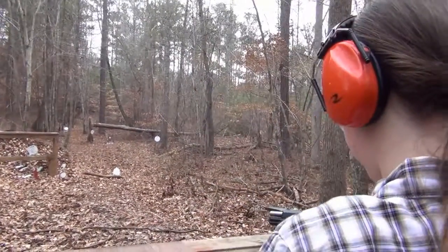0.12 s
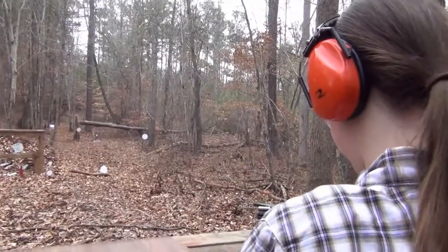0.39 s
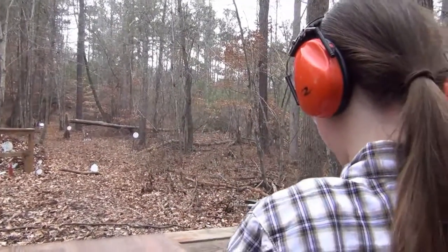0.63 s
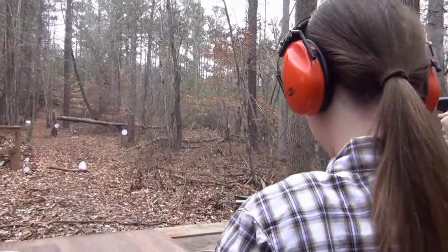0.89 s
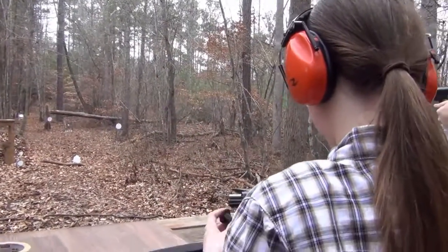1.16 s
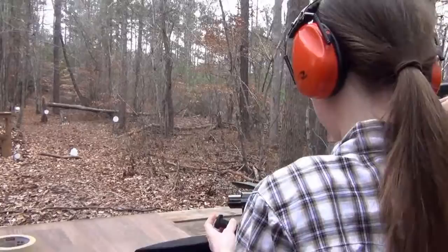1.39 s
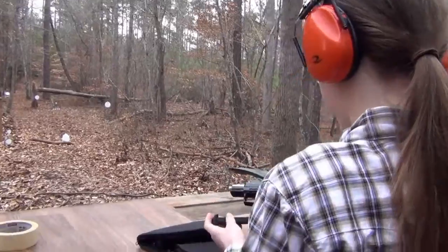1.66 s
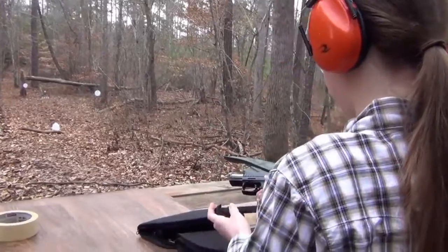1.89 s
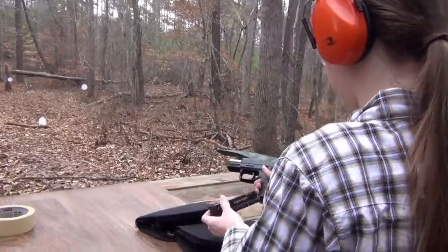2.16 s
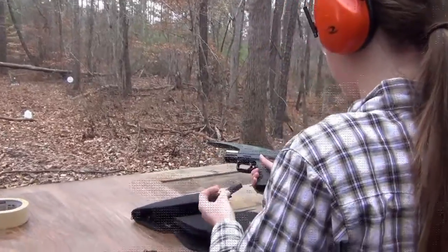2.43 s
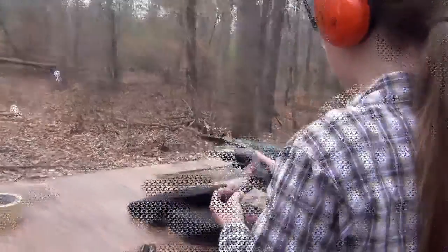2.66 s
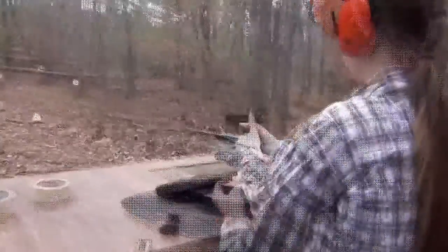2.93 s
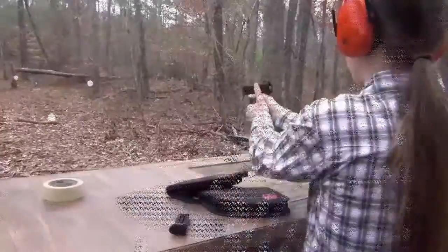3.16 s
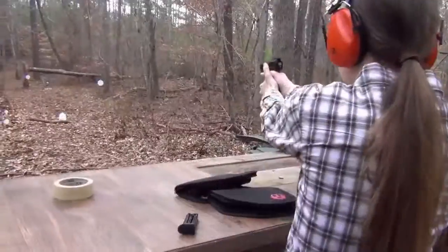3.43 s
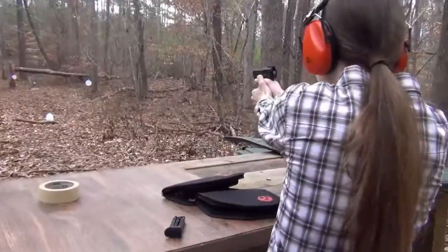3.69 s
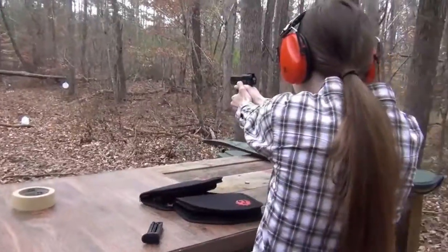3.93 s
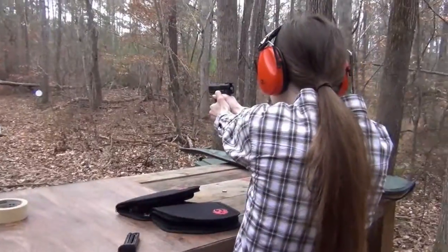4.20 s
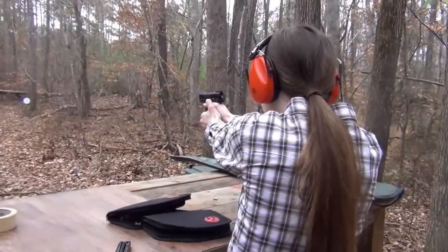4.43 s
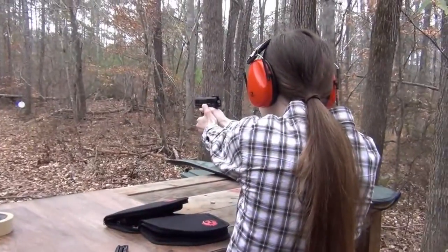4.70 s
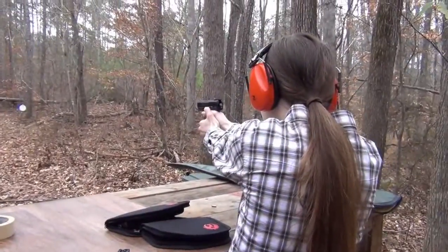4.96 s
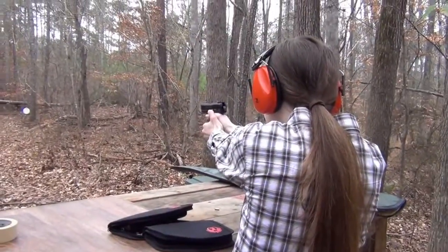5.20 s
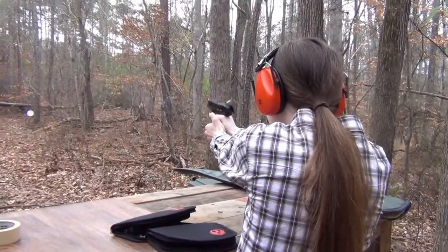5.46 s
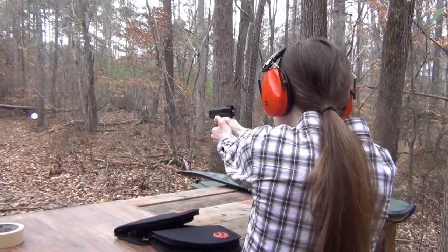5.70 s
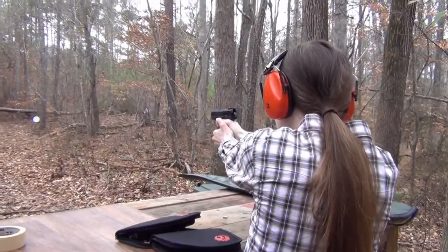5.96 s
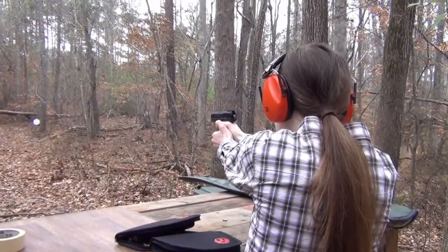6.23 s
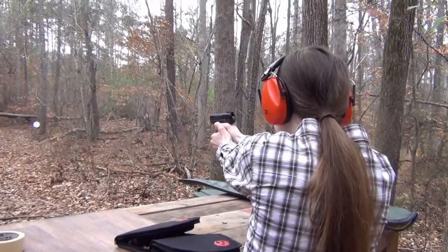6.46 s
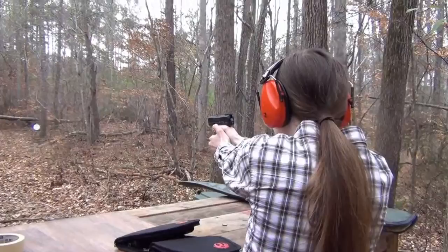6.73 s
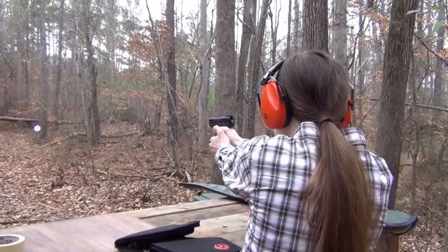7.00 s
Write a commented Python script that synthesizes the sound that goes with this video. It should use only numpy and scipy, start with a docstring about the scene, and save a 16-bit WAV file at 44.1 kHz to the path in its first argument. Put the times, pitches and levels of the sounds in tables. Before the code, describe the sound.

Four gunshots at an outdoor bench, heard from just behind the shooter. The first two are light and snappy, the later two deeper and thumpier. The first three are followed by a bright wavering clang from steel downrange. Echoes slap off trunks and merge into long, dulling hiss. Between shots come faint plate taps, wooden knocks, metallic clicks and cloth rustle over soft, low air noise, with heavy limiting on the blasts.

```python
"""Pistol practice in a bare wood

Small pistols are fired from a bench: each shot is a crack and a thump of noise, then noise slaps off the
trunks that merge into a long hiss. A steel plate downrange rings as paired, beating modes; spent cases,
clicks and cloth are shaped noise close to the microphone. The camera's limiter flattens every shot. One
scene dissolves into a second, nearer one where clothing rustles before a deeper shot."""
import sys
import numpy as np
from scipy import signal
from scipy.fft import rfft, irfft
from scipy.io import wavfile
from scipy.ndimage import uniform_filter1d

SR = 44100
rng = np.random.default_rng(int(sys.argv[2]) if len(sys.argv) > 2 else 0)


def unload_wav(signal):
    """Save mono or channel-first audio to the path in sys.argv[1] as 16-bit WAV at rate SR, clipped to [-1, 1]."""
    wavfile.write(
        sys.argv[1],
        SR,
        np.round(np.clip(np.atleast_2d(signal).T, -1, 1) * 32767).astype(np.int16),
    )


def ratio_of_db(decibels):
    """Turn decibels (scalar or array-like) into linear amplitude factors; 0 dB maps to 1."""
    return 10 ** (np.asarray(decibels, float) / 20)


N = 313551  # length in samples

# bright colour of cloth: hz, density_db (dB per Hz)
CLOTH_COLOUR = [(120, -47), (200, -7.5), (454, -5.5), (827, -8), (923, -5.5), (1010, -8), (1280, -9),
                (3010, -8.5), (3480, -10), (5800, -7.5), (7760, 0.5), (11000, -19), (15500, -26)]


def evened(x):
    """Scales to rms 1."""
    return x / np.sqrt(np.mean(x ** 2) + 1e-20)


def read(points, hz):
    """Reads a table on a log-frequency axis."""
    f, value = np.transpose(points)
    return np.interp(np.log(hz + 1), np.log(f + 1), value)


def add(mix, start_s, sound, pan_db=0):
    """Mixes a sound in at its time; a positive pan_db leans it to the left."""
    part = mix[:, round(start_s * SR):][:, :sound.shape[-1]]
    part += (sound * ratio_of_db([[pan_db / 2], [-pan_db / 2]]))[:, :part.shape[1]]


def causal(points):
    """Minimum-phase impulse with the given colour, energy 1."""
    hz = abs(np.fft.fftfreq(8192, 1 / SR))
    log_gain = np.log(ratio_of_db(np.maximum(read(points, hz), -70)))
    taps = np.fft.ifft(np.exp(np.conj(signal.hilbert(log_gain)))).real[:2048]
    return taps / np.linalg.norm(taps)


def hiss(points, grain_db):
    """Coloured stereo noise of rms 1, partly alike left and right, with a grainy flicker."""
    # left-right likeness of still air and rustle: hz, likeness (0-1)
    likeness = [(60, 0.93), (180, 0.82), (550, 0.91), (1650, 0.99), (4970, 0.95), (15000, 0.68)]
    hz = np.fft.rfftfreq(N, 1 / SR)
    a, b, flicker = rng.standard_normal((N, 3)).T
    grain = ratio_of_db(grain_db * evened(uniform_filter1d(flicker, size=130)))
    a, b = rfft(a * grain), rfft(b * grain)
    same = np.clip(read(likeness, hz), 0, 1)
    mid, side = np.sqrt(1 + same) * a, np.sqrt(1 - same) * b
    return evened(irfft(np.array([mid + side, mid - side]) * ratio_of_db(read(points, hz)), N))


def first_air():
    """Still air of the first place: steady coloured noise, mostly low."""
    # hz, density_db (dB per Hz)
    air_colour = [(18, -41.5), (30, -18), (90, -3.5), (200, -16), (320, -15), (600, -13), (850, -9.5),
                  (1600, -13.5), (3100, -21), (5800, -27), (7800, -23), (10500, -33), (15400, -35)]
    return ratio_of_db(-54.5) * hiss(air_colour, grain_db=2.0)


def second_air():
    """Still air of the second, nearer place: steady noise of another colour."""
    # hz, density_db (dB per Hz)
    air_colour = [(18, -38), (30, -18), (95, 2), (263, -12), (479, -5.5), (546, -13), (852, -10),
                  (1770, -17), (6050, -25.5), (7460, -26.5), (14300, -31.5), (15500, -26)]
    return ratio_of_db(-51) * hiss(air_colour, grain_db=1.5)


def camera_whine(t):
    """Thin steady whine of the camera: one high sine."""
    return ratio_of_db(-70) * np.sin(2 * np.pi * 15735 * t)


def click(peak_db, hz, t60_s=0.04):
    """A burst of noise around one broad resonance, over the bright colour of cloth."""
    t = np.arange(3000) / SR
    burst = rng.standard_normal(len(t)) * ratio_of_db(-60 * t / max(t60_s, .005)) * (1 - np.exp(-t / 0.00044))
    burst[0] = 4.9  # the first contact
    peak = signal.iirpeak(hz, 1.8, SR)
    narrow = signal.lfilter(*peak, signal.lfilter(*peak, burst))
    wide = signal.oaconvolve(burst, causal(CLOTH_COLOUR))[:len(t)]
    both = narrow / abs(narrow).max() + 1.9 * wide / abs(wide).max()
    return ratio_of_db(peak_db) * both / abs(both).max()


def add_hand_clicks(mix):
    """Small clicks of hands, metal and cloth close to the microphone."""
    # start_s, peak_db, centre_hz, pan_db (left minus right)
    clicks = [(0.032, -31, 7900, 3.5), (.82, -43, 8500, 7), (1.395, -46.5, 7650, 2),
              (1.4168, -41.5, 6700, 2), (2.0565, -44, 7760, .6), (2.099, -46, 3670, 0),
              (2.126, -50, 7580, 7), (2.369, -45, 7510, -1), (2.477, -39.5, 3600, 3),
              (3.3718, -20.5, 6740, -1), (3.3790, -24.5, 6960, 7), (3.4198, -23.5, 5930, -3),
              (3.4346, -28, 7210, -1), (3.6886, -27.5, 7140, -2), (3.735, -27.5, 7450, -.6),
              (3.8465, -30.5, 6800, -2), (3.9, -35, 7850, .6), (3.931, -33, 7760, 1),
              (4.315, -35.5, 7500, 7), (4.4677, -42, 6760, 3), (4.8168, -33, 4570, 4),
              (5.1515, -45, 8040, 4), (5.474, -49, 7500, -2), (6.6294, -52, 3520, -3)]
    for start_s, peak_db, hz, pan_db in clicks:
        add(mix, start_s, click(peak_db, hz), pan_db)


def add_faint_ticks(mix):
    """Fainter ticks at random times, four a second on average, each with its own level, pitch and side."""
    length_s = N / SR
    for when, size, pitch, side in rng.random((round(4 * length_s), 4)):
        tick = click(-54 + 6 * size, 3000 + 5200 * pitch)
        add(mix, when * length_s, tick, 6 * side - 3)


def add_short_clicks(mix):
    """Short resonant clicks just before three of the shots."""
    # start_s, peak_db, centre_hz, t60_s
    short_clicks = [(.0693, -30, 8000, .08), (2.5222, -31, 7000, .04), (5.5176, -24, 2600, .012)]
    for start_s, *settings in short_clicks:
        add(mix, start_s, click(*settings))


def crowding(t, stands, slopes):
    """Echo gain along the path: blunt-edged stands of trunks over the slowly rising answer of the slopes."""
    near = sum(ratio_of_db(db) ** 2 * np.exp(-((t - s) / depth_s) ** 4) for s, depth_s, db in stands)
    start_db, rise_db_per_s = slopes
    return np.sqrt(near + ratio_of_db(start_db + rise_db_per_s * t) ** 2)


def shot(thump_db, echo_db, bright_db, slaps_db, colour, blast, wood, stands, slopes):
    """A short crack and a low thump, then echoes off trunks: single slaps merging into hiss that dulls as it dies."""
    # stereo spread of the echoes: hz, side_minus_mid_db
    spread = [(60, 12.5), (150, -9.5), (380, -14.5), (950, -19.5), (2380, -24.5), (5980, -11), (15000, -12)]
    crack_db, *thump_band_hz = blast
    t = np.arange(round(2.5 * SR)) / SR
    noise = rng.standard_normal((len(t), 2)).T
    pick, size = rng.random(len(t)), rng.exponential(1, len(t))

    # about 220 slaps a second, of uneven strength
    slaps = (pick < 220 / SR) * ratio_of_db(slaps_db + 2.16 * np.minimum(size, 3) - 60 * t / 0.89)
    slaps *= np.minimum(0.89 + t / 0.045, 1)
    slaps = signal.lfilter([1], [1, -0.975], slaps)  # each slap lasts about a millisecond

    hz, frame_s, z = signal.stft(noise * (1 + slaps), SR, nperseg=256)
    rows = hz[:, None]
    tilt_db = bright_db * np.log2((rows + 200) / 3000)
    z *= ratio_of_db(tilt_db - 60 * frame_s / read(wood, hz)[:, None])
    patches = rng.standard_normal(z.shape[1:])
    patches = uniform_filter1d(uniform_filter1d(patches, size=9, axis=0), size=5, axis=1)
    z *= ratio_of_db(2.18 * evened(patches) * np.exp(-frame_s / 0.23))  # near trunks return uneven colours
    z *= 1 - 0.48 * np.exp(-frame_s / 0.0083) * (rows < 5500)  # all but the treble builds up later
    z[1] *= ratio_of_db(read(spread, hz))[:, None]
    echo = signal.istft(z, SR, nperseg=256)[1][:, :len(t)]
    echo *= ratio_of_db(echo_db) * crowding(t, stands, slopes) * np.minimum(t / 0.0069, 1)

    # the crack sits in the middle and shares the colour of the echo
    echo[0] += ratio_of_db(crack_db) * noise[0] * (1 - np.exp(-t / 0.00068)) * np.exp(-t / 0.0016)
    mid, side = signal.oaconvolve(echo, causal(colour)[None], axes=1)[:, :len(t)]

    # the blast shakes bench and camera
    low = signal.sosfilt(signal.butter(2, thump_band_hz, "band", fs=SR, output="sos"), noise)
    thump = ratio_of_db(thump_db) * low * (1 - np.exp(-t / 0.0073)) * np.exp(-t / 0.014)
    left = mid + side + thump[0] + 0.92 * thump[1]
    right = mid - side + thump[0] - 0.89 * thump[1]
    return np.array([left, right])


def fire_shots(first, second):
    """Fires each shot in the place given for it, whose trunks and slopes shape the echo."""
    # start_s, thump_db, echo_db, brightness_db_per_octave, slaps_db
    shots = [(0.0768, 10, 13, 0.57, 7.5), (2.529, 2.5, 8.5, -0.14, 8.5), (3.1309, 19.5, 10.5, 0.45, 7),
             (5.5216, 20, 8.5, 0.5, -2.5)]
    # for each shot: scene (0 first, 1 second), pistol (0 light, 1 deep)
    fired = [(0, 0), (0, 0), (0, 1), (1, 1)]
    # of each pistol: crack_db, thump_from_hz, thump_to_hz
    blasts = [(-13, 12, 930), (13.5, 200, 780)]
    # colour of crack and echo of each pistol: hz, density_db (dB per Hz)
    light_pistol = [(24, -96.5), (40, -34), (130, -24), (503, -18.5), (790, -9.5), (852, -9), (1210, -9.5),
                    (1300, -6.5), (2980, -2.5), (5720, -8.5), (7930, 4), (16000, -34)]
    deep_pistol = [(24, -69), (40, -22), (189, -17.5), (256, -14), (392, -9), (600, -7.5), (680, -4),
                   (1120, -4.5), (1300, -5.5), (2910, -12.5), (8130, -9.5), (16000, -39)]
    # how fast the wood swallows each band: hz, t60_s
    wood_first = [(100, 0.54), (300, 1.13), (700, 2), (1500, 1.873), (3000, 1.29), (6000, 0.95),
                  (9000, 0.68), (15000, 0.54)]
    wood_second = [(100, 0.13), (300, 1.69), (700, 2.444), (1500, 2.064), (3000, 1.634), (4300, 1.26),
                   (6000, 1.026), (9000, 0.87), (15000, 0.42)]
    # stands of trunks that throw the shot back: after_shot_s, half_depth_s, level_db
    stands_first = [(.09, 0.059, -8), (.21, 0.054, -9)]
    stands_second = [(.04, 0.1, -6.5), (.24, 0.11, -12.5)]
    # answer of the far slopes, ahead of the wood's decay: level_at_shot_db, rise_db_per_s
    slopes_first = (-18, 8.83)
    slopes_second = (-18, 8.66)

    places = [(first, wood_first, stands_first, slopes_first, 0.0),
              (second, wood_second, stands_second, slopes_second, -1.0)]
    for (start_s, *levels), (where, pistol) in zip(shots, fired):
        mix, wood, stands, slopes, pan_db = places[where]
        colour = [light_pistol, deep_pistol][pistol]
        add(mix, start_s, shot(*levels, colour, blasts[pistol], wood, stands, slopes), pan_db)


def plate(db, bright_db, bias_db, clang_db, ring_share):
    """Plate modes in close twins that beat; the first clang dies fast, the ring wavers as echoes join it."""
    # modes of the steel plate: hz
    modes_hz = [2038, 2821, 4542, 4577, 4866, 7310, 7677, 8387, 10119, 11240, 12772, 13250]
    # for each mode: level_db, t60_s (of the free ring), side of a split pair (about -1..1),
    # beat_hz of its twin, left-right phase_rad
    modes = [(0, 0.41, 0.8, 5.3, 0.24), (-9.5, 0.6, 0.21, 16, 0.19), (-13, 0.41, -0.46, 5.2, 0.21),
             (-13.5, 0.87, 0.92, 3.6, 0.18), (-11.5, 0.64, 0.2, 8.2, 0.27), (2.5, 0.48, -1.32, 11.9, 0.97),
             (-7.5, 0.6, 0.92, 8.02, 0.45), (-6, 0.46, -0.11, 9.8, 0.95), (-6.5, 0.39, -0.67, 17.7, 0.24),
             (-30.5, 0.53, 1, 9.5, 0.28), (-36, 0.53, 0.92, 6.6, 0.36), (-17, 0.28, -1.7, 12.8, .5)]
    t, out = np.arange(round(1.2 * SR)) / SR, 0
    for hz, (mode_db, t60_s, pair, beat_hz, phase_rad) in zip(modes_hz, modes):
        waver = sum(np.sin(2 * np.pi * (f * t + rng.random())) for f in (7, 13, 23))
        level_db = db + mode_db + bright_db * np.log2(hz / 4500) + pair * bias_db + 1.9 * waver
        level_db += clang_db * (hz == 2821)  # a blow near the middle clangs harder and wakes this mode
        twin = 1 + 0.47 * np.exp(2j * np.pi * (beat_hz * t + rng.random()))
        fade_db = -60 * t / (t60_s * ring_share)
        fade = ratio_of_db(fade_db) + ratio_of_db(-30.5 + fade_db / 2.4)  # a faint after-ring lasts 2.4 times longer
        ring = ratio_of_db(level_db) * fade * twin * np.exp(2j * np.pi * (hz * t + rng.random()))
        out = out + (ring * np.exp([[.5j * phase_rad], [-.5j * phase_rad]])).real
    clang = ratio_of_db(clang_db * np.exp(-(t / 0.053) ** 2))
    return out * (1 - np.exp(-t / 0.00067)) * clang


def ring_plate(mix):
    """Bullets strike the plate, and the swinging plate taps its hook."""
    # start_s, level_db, brightness_db_per_octave, pair_bias_db, first_clang_extra_db
    bullets = [(.203, 1.5, 5, 3.5, 4), (2.660, 0.5, -4, -2.5, -10), (3.262, 0, 8, 13, 2)]
    # start_s, level_db, brightness_db_per_octave
    hook_taps = [(1.292, -51.5, -6), (1.951, -54.5, -6), (2.37, -64, -5)]
    blows = [(s, plate(*blow, ring_share=0.9)) for s, *blow in bullets]
    blows += [(s, plate(*tap, bias_db=5, clang_db=-1.5, ring_share=0.56)) for s, *tap in hook_taps]
    for start_s, sound in blows:
        add(mix, start_s, sound, 0.7 + 1.4 * start_s)  # the plate drifts left as the camera turns


def bench_knock(db, hz, wood_db):
    """A dry broad snap of a few milliseconds that also excites the short dull modes of the bench."""
    # modes of the bench: hz, level_db, t60_s
    bench = [(277, -7.5, 0.17), (413, -6, 0.08), (655, 9, 0.054), (954, 7, 0.045)]
    t = np.arange(4000) / SR
    clatter = rng.standard_normal(len(t)) * np.exp(-t / 0.0038)
    clatter[0] = 3.8  # the first contact
    modes = sum(ratio_of_db(d - 60 * t / t60_s) * np.sin(2 * np.pi * f * t) for f, d, t60_s in bench)
    wood = signal.oaconvolve(modes, clatter)[:len(t)]
    snap = signal.sosfilt(signal.butter(2, [0.61 * hz, 2.44 * hz], "band", fs=SR, output="sos"), clatter)
    case_ring = np.sin(2 * np.pi * hz * t) * np.exp(-(t / 0.0045) ** 3)  # rings until it lands flat
    snap = snap / abs(snap).max() + 0.76 * case_ring
    knock = snap / abs(snap).max() + ratio_of_db(wood_db) * wood / abs(wood).max()
    return ratio_of_db(db) * signal.sosfilt(signal.butter(2, 220, "high", fs=SR, output="sos"), knock)


def add_bench_knocks(mix):
    """Spent cases and knocks on the bench, each a snap with the bench's wood under it."""
    # start_s, level_db, snap_centre_hz, pan_db (left minus right), wood_db (relative to the snap)
    knocks = [(0.4803, -13.5, 1825, 0.5, -7), (2.974, -13, 1490, 3, -20), (3.565, -29.5, 865, -3, -10),
              (4.317, -36, 1600, 1, -9), (4.373, -24.5, 1810, 1.5, -18), (5.283, -38, 1670, 4, -13),
              (5.358, -31, 1010, 4, -15)]
    for start_s, db, hz, pan_db, wood_db in knocks:
        add(mix, start_s, bench_knock(db, hz, wood_db), pan_db)


def sleeves(t):
    """Moving sleeves: each stroke of cloth noise swells to its peak and dies away."""
    # loudest_s, level_db, rise_s, fall_s
    strokes = [(3.28, -37, 0.062, 0.16), (3.385, -35, 0.025, 0.018), (3.58, -42, 0.26, 0.17),
               (3.786, -36.5, 0.044, 0.063), (3.93, -50, .08, 0.15), (4.11, -36.5, 0.075, 0.088),
               (4.24, -40, 0.047, 0.036), (4.35, -47, 0.11, 0.19), (4.52, -44, 0.08, 0.085),
               (4.824, -46.5, 0.023, .012), (5.08, -52.5, 0.21, .1), (5.34, -49, 0.16, 0.069),
               (5.502, -40, 0.037, 0.06), (6.9, -57, .02, .02), (7.065, -48, 0.023, 0.022)]
    power = sum(ratio_of_db(db) ** 2 * np.exp(-2 * abs(t - s) / np.where(t < s, rise_s, fall_s))
                for s, db, rise_s, fall_s in strokes)
    return np.sqrt(power) * hiss(CLOTH_COLOUR, grain_db=1.5)


def limited(x, ceiling_db, recover_db_s, late_s):
    """Gain falls around the start of a loud sound and recovers steadily; what slips through saturates softly."""
    power_db = 10 * np.log10(abs(uniform_filter1d((x ** 2).mean(0), size=300)) + 1e-12)
    fall_db = np.arange(N) * recover_db_s / SR
    held_db = np.maximum.accumulate(power_db + fall_db) - fall_db
    over_db = np.maximum(held_db - ceiling_db, 0)
    over_db = np.roll(uniform_filter1d(over_db, size=130), round(late_s * SR))
    return 0.69 * np.tanh(x / ratio_of_db(over_db) / 0.81)


def scene():
    """Two limited scenes dissolve into each other; the small near sounds lie on top."""
    # a fade with a quick drop near its end: time_s, share of the first scene (0-1)
    dissolve = [(2.35, 1), (3.25, 0.19), (3.275, 0.096), (3.45, 0)]
    t = np.arange(N) / SR
    first = first_air() + camera_whine(t)
    second = second_air() + camera_whine(t) + sleeves(t)
    fire_shots(first, second)
    ring_plate(first)
    share = np.clip(np.interp(t, *np.transpose(dissolve)), 0, 1)
    mix = share * limited(first, ceiling_db=-14.0, recover_db_s=133.0, late_s=0.0)
    mix += (1 - share) * limited(second, ceiling_db=-14.0, recover_db_s=132.0, late_s=0.0034)
    add_bench_knocks(mix)
    add_hand_clicks(mix)
    add_short_clicks(mix)
    add_faint_ticks(mix)
    return mix


def top_cut(x):
    """Nothing passes above the cut-off."""
    return signal.sosfilt(signal.butter(12, 16950, fs=SR, output="sos"), x)


def record(dry):
    """Cuts the treble steeply around 16 kHz and returns the finished mix."""
    edge = signal.firwin(511, 16050, window=("kaiser", 9), fs=SR)
    mix = signal.oaconvolve(dry, edge[None], "same", axes=1)
    return top_cut(mix)


dry = scene()
out = record(dry)
unload_wav(out)
```